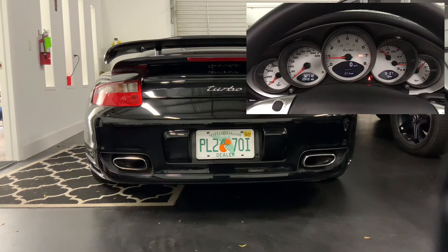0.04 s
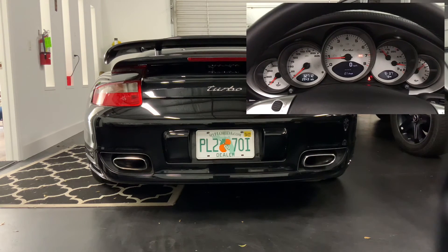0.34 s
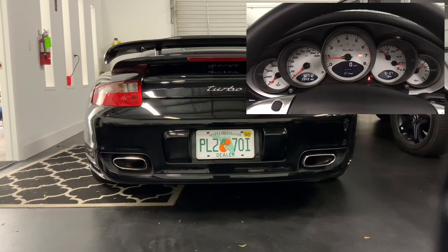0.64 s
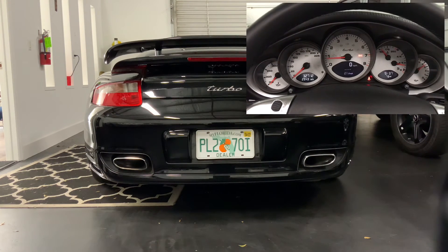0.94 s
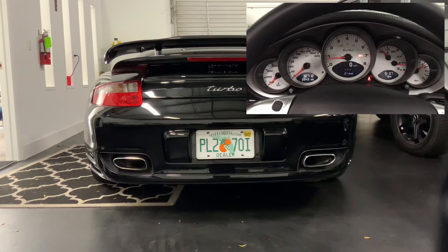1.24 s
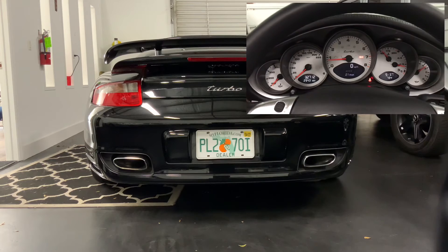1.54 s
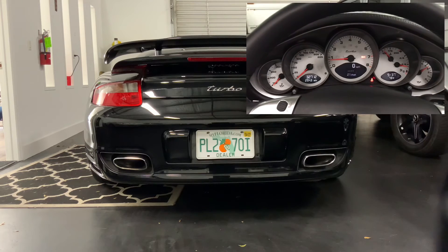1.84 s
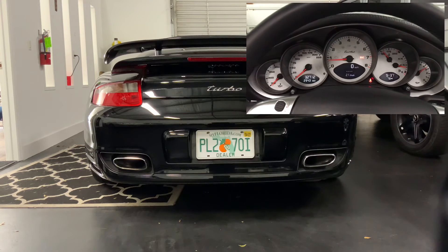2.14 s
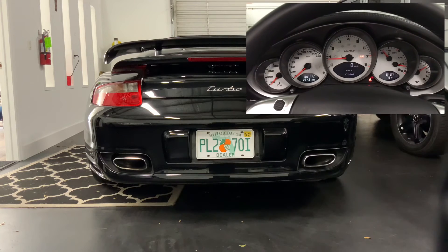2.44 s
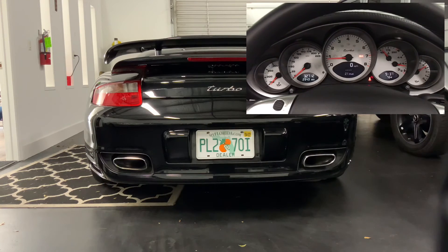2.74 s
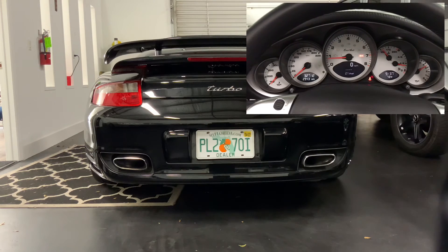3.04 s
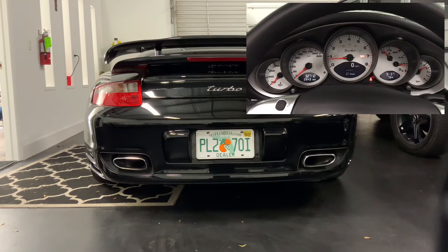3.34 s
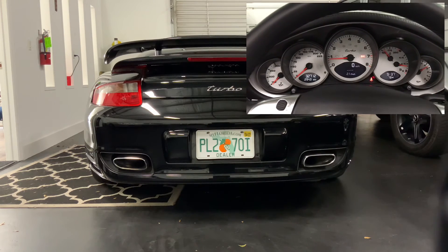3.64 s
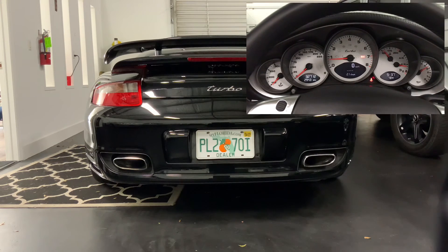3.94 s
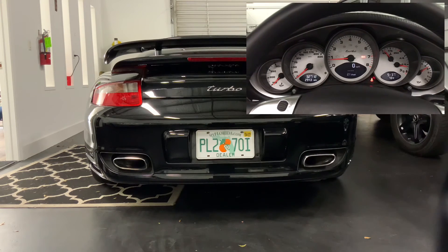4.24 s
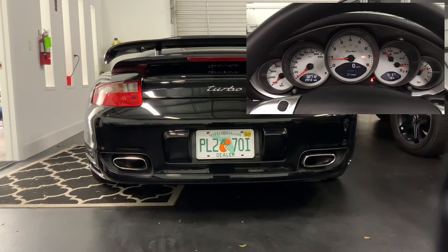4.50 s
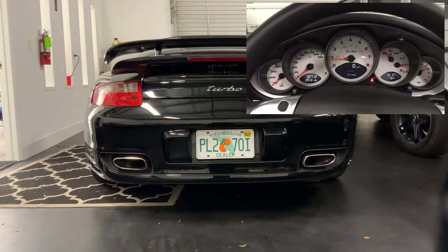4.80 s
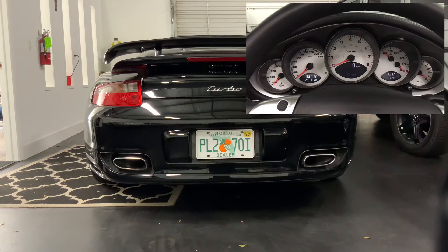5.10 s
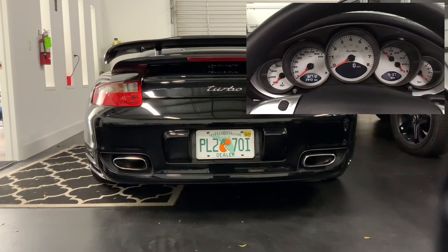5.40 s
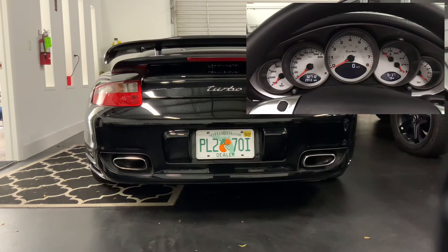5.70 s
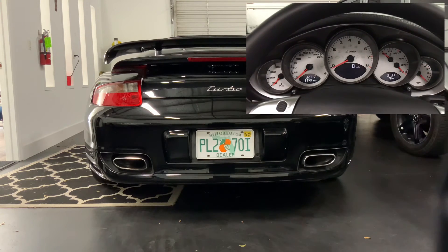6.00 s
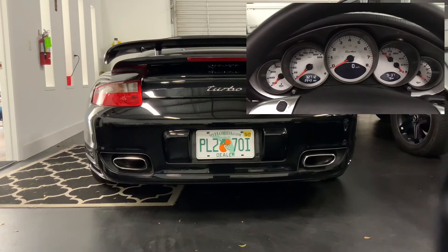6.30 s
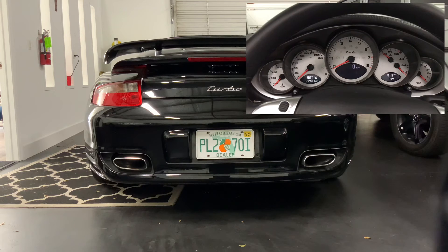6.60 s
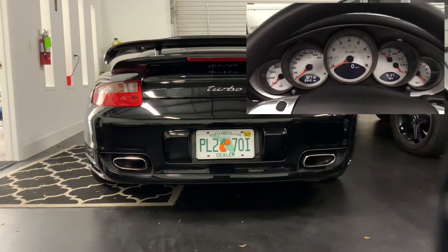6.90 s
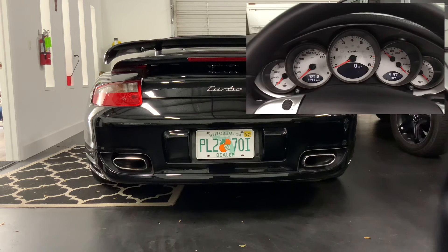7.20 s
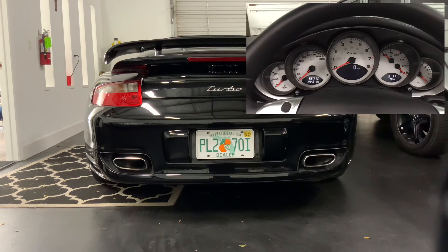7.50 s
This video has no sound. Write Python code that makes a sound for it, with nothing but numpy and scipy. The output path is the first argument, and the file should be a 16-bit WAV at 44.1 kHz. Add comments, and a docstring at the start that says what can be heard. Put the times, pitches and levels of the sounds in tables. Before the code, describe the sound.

A sports car idles in a garage with a steady, deep exhaust drone. The ignition switch clicks and the engine dies away in under a second with a brief chatter and soft shudder. Then, close to the microphone, the key clicks as it is turned back, rattles out of the lock and clacks sharply against hard trim. A sleeve rustles faintly and a low room hum remains.

```python
"""A flat-six sports car idles in a garage, its exhaust pulses sounding as harmonics of the firing rate.
The ignition clicks off and the engine coasts to rest in under a second, puffing into the silencer and
rocking the car's body while its gears chatter. The key is turned back, pulled from the lock and clacks
against hard trim; each impact excites damped modes, and the heavier ones thud in the body.
A sleeve rustles, and a low hum remains in the room."""
import sys
import numpy as np
from scipy import signal
from scipy.fft import rfft, irfft, next_fast_len
from scipy.io import wavfile
from scipy.ndimage import map_coordinates

SR = 44100
rng = np.random.default_rng(int(sys.argv[2]) if len(sys.argv) > 2 else 0)


def transcribe(signal):
    """Save signal, clipped to [-1, 1], as a 16-bit WAV file at the path in sys.argv[1]."""
    frames = np.atleast_2d(signal).T
    limited = np.clip(frames, -1, 1)
    pcm = np.round(limited * 32767).astype(np.int16)
    wavfile.write(sys.argv[1], SR, pcm)


N = 332955
CUT_S, FUEL_FADE_S = 4.963, 0.038  # the last firing, and the time combustion takes to die
COAST_S, COAST_SHAPE = 0.68, 0.7  # time the crank takes to stop; a shape under 1 brakes hardest at the end

# Drift of the idle speed. Each row: time in seconds, firings per second.
IDLE_RATE = [(0.0, 39.33), (1.2, 38.2), (1.35, 38.61), (1.65, 38.19), (1.95, 38.77), (2.1, 38.32),
             (2.55, 39.17), (3.15, 38.82), (3.3, 38.33), (3.75, 38.95), (4.35, 38.12), (4.5, 38.54),
             (4.8, 37.96)]
# The exhaust note. Each row: multiple of the firing rate, relative level in dB.
EXHAUST_ORDERS = [(0.5, -58), (1, 1), (1.5, -33.5), (2, -3), (2.5, -20.5), (3, -7), (3.5, -51), (4, -24),
                  (4.5, -59), (5, -33), (5.5, -28.5), (6, -29.5), (6.5, -38), (7, -32), (7.5, -41.5),
                  (8, -36.5), (8.5, -32), (9, -39), (9.5, -51.5), (10, -38)]
# Drone of a belt-driven pump. Each row: multiple of its stroke rate, level in dB.
PUMP_ORDERS = [(2, -58), (3, -59), (4, -58), (5, -59)]
# Bursts of drive-train chatter. Each row: start in seconds, level in dB.
CHATTER_BURSTS = [(4.976, -34.5), (5.046, -40.5), (5.165, -43.5)]

# Spectral envelopes of the noises. Each row: frequency in Hz, relative level in dB.
PIPE_SPECTRUM = [(76, -28.5), (130, -3.5), (146, -5.5), (221, -8.5), (306, -17.5), (344, -20), (376, -17),
                 (470, -24), (600, -35.5), (780, -38.5), (1320, -120)]
CHURN_SPECTRUM = [(240, -30), (400, -6), (580, -6), (675, -1), (790, -8), (890, -4.5), (1010, -7.5),
                  (1160, -4), (1400, -9.5), (1830, -11.5), (2200, -16), (2500, -15.5), (4500, -22),
                  (6000, -33)]
HISS_SPECTRUM = [(2060, -15), (3500, -8), (4650, -4), (5050, -3), (6740, 0), (7800, -7.5), (8730, -4),
                 (9720, -6.5), (10600, -14), (11200, -8), (11800, -14), (12200, -10), (15800, -23)]
INJECTOR_SPECTRUM = [(11100, -30), (11450, -7), (11540, 0), (11800, -7), (12200, -28)]
GEAR_SPECTRUM = [(600, -31), (950, -3), (1130, 8), (1400, -7), (1800, -8), (2250, -14), (2850, -6.5),
                 (3400, -19), (9000, -30)]
BLADE_SPECTRUM = [(500, -2), (1400, 6), (3500, -5.5), (6500, -3), (10300, -7), (11800, -6), (16000, -21)]
CLOTH_SPECTRUM = [(400, -12), (1400, -4.5), (2200, -5), (3800, -4.5), (7000, -14), (11000, -21),
                  (16000, -25)]
ROOM_SPECTRUM = [(15, -52), (25, -22.5), (43, 4), (64, -13.5), (96, -10.5), (211, -13.5), (450, -30.5),
                 (769, -31.5), (1400, -34.5), (3390, -39.5), (3880, -35), (4210, -38), (4950, -43),
                 (5520, -40), (9460, -45), (10500, -48.5), (15800, -49.5)]

# Resonances. Each row: frequency in Hz, relative level in dB, time to decay by 60 dB in seconds.
SILENCER_MODES = [(47.3, 0.5, 0.62), (59.7, -6, 0.47), (146, -9, 0.22), (211, -19, 0.31), (303, -16, 0.16)]
SWITCH_MODES = [(1170, -8, .06), (1820, 2, .04), (2580, -5, 0.032), (2625, -2, .04), (4060, 3.5, 0.058),
                (5570, -4, .055), (5900, 4, .04), (6511, 7, 0.039), (7240, -10, 0.04), (7915, -3, 0.042),
                (8735, -2, .05), (12170, -6, .042)]
LOCK_MODES = [(1226, 1.5, 0.071), (1915, -3, 0.056), (2550, -10, .04), (3330, -3, .06), (4410, 6, .055),
              (5370, -4, .04), (5840, -7, 0.035), (6700, 4, .06), (8300, -1, .035), (9600, -2, .035),
              (10700, -10, .04), (11500, 1, .04), (12900, 2, .04), (15000, -9, .04)]
FOB_MODES = [(1165, -5, 0.096), (1440, -9, .08), (1470, -9, 0.074), (2510, -14, 0.074), (3616, 5, .06),
             (3680, -1, 0.1), (4550, 4, .08), (5320, -7, 0.076), (6700, -2, .052), (7340, 5, .043),
             (7300, -5, 0.042), (7760, -4, .035), (9800, 0, 0.058), (12900, -13, .05)]

# Impacts in the ignition switch, of the key on the tumblers, and of key and fob on the trim.
# Each row: start in seconds, overall gain in dB, further gains in dB for the clack and for the tick.
SWITCH_HITS = [(4.7249, -10.5, -11.5, -8), (4.7314, -22, -11, -20), (4.7486, -37, 6.5, -22),
               (4.787, -44, -7, 2), (4.828, -23, -4.5, -8), (4.8412, -28, 0.5, -26),
               (4.921, -35.5, -20, -6)]
LOCK_HITS = [(5.9534, -33.5, 1, -25), (5.966, -36.5, 5.5, -8), (5.9902, -37.5, -18, -10.5),
             (6.039, -49.5, 6.5, -24), (6.5261, -35.5, 2.5, -3), (6.5295, -36.5, 9, -29.5),
             (6.575, -55, 12, -7), (6.6058, -30.5, -3, 1.5), (6.6204, -37, -8, -3), (6.6267, -28, -2.5, -1),
             (6.6486, -36, -5, -6), (6.6583, -25, -17, 1.5), (6.6655, -19, -11.5, -6),
             (6.7855, -35, -11, -6.5)]
FOB_HITS = [(6.9556, -36, -10, -10), (6.9777, -31, 5.5, -32), (6.9848, -20.5, -7, -19),
            (6.9957, -9, -11, -22), (7.0022, -18.5, -4.5, -17), (7.0186, -18.5, -5, -16),
            (7.0975, -37.5, 3, -27), (7.1198, -47, -3, -28), (7.1995, -44, -20, -24.5),
            (7.2254, -32.5, -29, -12), (7.232, -33, -31, -33), (7.4634, -54, -25, -21)]
# Thuds in the car's body. Each row: start in seconds, level in dB, 60 dB decay in seconds, pitch in Hz.
BODY_THUDS = [(5.16, -39, .3, 310), (5.955, -36.5, 0.32, 135), (6.532, -33.5, 0.27, 125),
              (6.626, -32, 0.29, 135), (6.661, -35.5, 0.18, 140), (6.999, -35, 0.18, 261)]
# Spectral envelope of a thud. Each row: multiple of its pitch, relative level in dB.
THUD_SPECTRUM = [(.35, -11), (.65, -0.5), (1, 8.5), (1.5, -7), (2.4, -5.5), (4, -9.5), (7, -18)]
# Rubbing of the key blade and of a sleeve. Each row: start in seconds, length in seconds, level in dB.
BLADE_RUBS = [(5.921, 0.046, -47.5), (6.2, .3, -72), (6.49, .05, -61)]
SLEEVE_RUBS = [(6.14, 0.27, -71), (6.44, 0.22, -69), (6.85, 0.47, -57.5)]
# Partials of the room's hum. Each row: frequency in Hz, level in dB.
HUM_PARTIALS = [(59.2, -50), (222, -68.5), (333.8, -75), (500.6, -81.5)]


def crank():
    """Friction stops the unfuelled crank. Returns speed as a share of idle and firing cycles from the cut."""
    t = np.arange(N) / SR
    speed = np.clip(1 - since_cut() / COAST_S, 0, 1) ** COAST_SHAPE
    cycles = np.cumsum(speed * np.interp(t, *np.transpose(IDLE_RATE))) / SR
    return speed, cycles - np.interp(CUT_S, t, cycles)


def exhaust(speed, firings, level_db=-22.5, flutter_db=3, dispersion=0.43, fall_db_per_s=37):
    """Periodic pulses form a harmonic series; uneven cylinders make its weak orders flutter."""
    note = np.zeros(N)
    for order, db in EXHAUST_ORDERS:
        depth_db = 0.5 * order if order in (1, 2, 3) else flutter_db
        lag = dispersion * (order - 1) ** 3  # the pipe delays high orders more, spreading each pulse
        phase = 2 * np.pi * order * firings - lag
        note += amp(db + depth_db * wobble(12)) * np.sin(phase + 0.2 * depth_db * wobble(16))
    fuel = np.clip(1 - since_cut() / FUEL_FADE_S, 0, 1)
    # without fuel the pistons still pump, so a weak note slides down and fades
    pumping = amp(-9.5 - fall_db_per_s * since_cut()) * np.minimum(2 * speed, 1)
    return amp(level_db) * np.maximum(fuel, pumping) * unit(note)


def engine_noise(firings):
    """Amplitude modulation: each stroke swells the gas rumble, the churn of valve gear and belts, and a hiss."""
    stroke = np.cos(2 * np.pi * firings)
    gas = unit(noise(PIPE_SPECTRUM) * amp(2.8 * stroke + 0.7 * wobble(2.8)))
    gas *= run_down(idle_db=-41.5, hold_s=0.14, fall_db_per_s=18.2)
    churn = unit(noise(CHURN_SPECTRUM) * amp(0.25 * stroke))
    churn *= run_down(idle_db=-47.5, hold_s=0.14, fall_db_per_s=18.2)
    hiss = unit(noise(HISS_SPECTRUM) * amp(0.3 * stroke))
    hiss *= run_down(idle_db=-60.5, hold_s=0.1, fall_db_per_s=32)
    return gas + wall_echoes(churn + hiss)


def pump(speed, firings, belt_ratio=1.922):
    """A non-integer drive ratio sets the pump's harmonics beside the firing orders."""
    phase = 2 * np.pi * belt_ratio * firings
    drone = sum(amp(db + 2 * wobble(5)) * np.sin(order * phase + 0.3 * wobble(6))
                for order, db in PUMP_ORDERS)
    return np.sqrt(2) * speed * drone


def injectors(firings, level_db=-76, fall_db=11):
    """A narrow resonance, excited on every second firing, ticks until the cut."""
    envelope = amp(-fall_db * (firings / 2 % 1) + 1.5 * wobble(25))
    return amp(level_db) * (since_cut() == 0) * unit(noise(INJECTOR_SPECTRUM) * envelope)


def silencer_puffs(firings, first_stroke=2.9, puff_db=-32, step_db=1.5, jolt_db=6):
    """Every second stroke of the coasting engine excites the silencer's modes; the first one jolts."""
    out, t = np.zeros(N), np.arange(SR // 2) / SR
    for k in range(6):
        start = np.argmax(firings >= first_stroke + 2 * k) / SR
        db = puff_db - step_db * k + jolt_db * (k == 0)
        add(out, start, amp(db) * ring(SILENCER_MODES, t, scatter_db=7) * rise(t, 0.0072))
    return out


def gear_chatter(t60=0.28, rough_db=2.5, knocks_per_s=210):
    """As the load drops away, gear teeth knock unevenly in exponentially decaying bursts."""
    envelope, t = np.zeros(N), np.arange(SR // 2) / SR
    for start, db in CHATTER_BURSTS:
        add(envelope, start, amp(db - 60 * t / t60) * rise(t, 0.003))
    return envelope * unit(noise(GEAR_SPECTRUM) * amp(rough_db * wobble(knocks_per_s)))


def key():
    """Impact and sliding friction: the switch snaps, the blade scrapes out, the fob knocks on the trim."""
    switch = impacts(SWITCH_HITS, SWITCH_MODES, t60=0.042, attack_s=0.00099,
                     snap_db=-12, clack_db=-2.5, tick_db=-10.5, ring_db=-1.5, lift_db=6)
    lock = impacts(LOCK_HITS, LOCK_MODES, t60=0.043, attack_s=0.0016,
                   snap_db=-9, clack_db=-5, tick_db=-8, ring_db=-7, lift_db=3)
    fob = impacts(FOB_HITS, FOB_MODES, t60=0.048, attack_s=0.0019,
                  snap_db=-7.5, clack_db=-1.5, tick_db=-3.5, ring_db=-5, lift_db=3)
    scrape = rubs(BLADE_RUBS, swell=0.43) * amp(2.2 * wobble(300)) * noise(BLADE_SPECTRUM)
    return switch + lock + fob + scrape


def impacts(hits, modes, t60, attack_s, snap_db, clack_db, tick_db, ring_db, lift_db):
    """A brief contact gives a broadband burst, coloured by the part's modes, which then ring freely."""
    out, t = np.zeros(N), np.arange(SR // 4) / SR
    fade = amp(-60 * t / t60)
    crack = amp(7 - 60 * t / 0.012)  # the sharp leading edge

    def band(points):
        return noise(points, len(t), modes, lift_db)

    for start, db, clack_gain_db, tick_gain_db in hits:
        snap = band([(1800, -17), (2600, 0), (7400, 4), (9500, -9.5)])
        clack = band([(250, -8), (700, 0.5), (1300, 3), (2400, -4.5), (3500, -8.5)])
        tick = band([(7500, -0.5), (9000, 3), (13000, 4), (16000, -7)])
        burst = amp(snap_db) * snap * (fade + 0.5 * crack)
        burst += amp(clack_db + clack_gain_db) * clack * fade ** 0.66  # the lowest band lasts longest
        burst += amp(tick_db + tick_gain_db) * tick * (fade + crack)
        tone = ring(modes, t, scatter_db=4.5)
        tone *= amp(ring_db) / np.abs(tone).max()
        add(out, start, amp(db) * (burst + tone) * rise(t, attack_s))
    return out


def body_thuds():
    """Damped vibration of the car's body: once as the stopping engine rocks, then from heavier key knocks."""
    out, t = np.zeros(N), np.arange(SR // 2) / SR
    for start, db, t60, hz in BODY_THUDS:
        thud = noise([(hz * multiple, level) for multiple, level in THUD_SPECTRUM], len(t))
        add(out, start, amp(db - 60 * t / t60) * rise(t, 0.0021) * thud)
    return out


def sleeve():
    """Friction of cloth makes noise whose level flickers within each stroke."""
    folds = unit(noise(CLOTH_SPECTRUM) * amp(1.5 * wobble(45) + 2 * wobble(400)))
    return rubs(SLEEVE_RUBS, swell=0.38) * folds


def wall_echoes(x, echo_db=-22, spread_s=0.06):
    """Early reflections: nearby hard surfaces add weak, delayed copies of either polarity."""
    out = x.copy()
    for delay, polarity in rng.random((8, 2)):
        add(out, spread_s * delay + 0.001005, amp(echo_db) * np.sign(polarity - 0.5) * x)
    return out


def cabin_reverb(x, t60=0.3, wet_db=-22):
    """Reverberation: dense reflections from the surrounding surfaces merge into a weak, decaying tail."""
    t = np.arange(SR // 2) / SR
    tail = noise([(100, 5), (3500, -7), (8000, -17), (16000, -2.5)], len(t)) * amp(-60 * t / t60)
    return x + amp(wet_db) * signal.fftconvolve(x, tail / np.linalg.norm(tail))[:N]


def room_hum(air_db=-54):
    """Low partials, slightly modulated in level and phase, stand over the steady noise of room air."""
    t = np.arange(N) / SR
    hum = sum(amp(db + 0.65 * wobble(5.2)) * np.sin(2 * np.pi * hz * t + 0.38 * wobble(4.6))
              for hz, db in HUM_PARTIALS)
    return np.sqrt(2) * hum + amp(air_db) * noise(ROOM_SPECTRUM)


def since_cut():
    """Seconds since the last firing, zero while the engine runs."""
    return np.maximum(np.arange(N) / SR - CUT_S, 0)


def run_down(idle_db, hold_s, fall_db_per_s):
    """A gain that holds until shortly after the cut, then decays exponentially."""
    return amp(idle_db - fall_db_per_s * np.maximum(since_cut() - hold_s, 0))


def rubs(rows, swell):
    """Friction gain follows a power of the sliding speed, which is half a sine in each stroke."""
    t = np.arange(N) / SR
    return sum(amp(db) * np.abs(np.sin(np.pi * np.clip((t - start) / length, 0, 1))) ** swell
               for start, length, db in rows)


def ring(modes, t, scatter_db):
    """Free vibration: a sum of damped sinusoids, each struck at a random strength."""
    return sum(amp(db + scatter_db * rng.standard_normal() - 60 * t / t60) * np.sin(2 * np.pi * hz * t)
               for hz, db, t60 in modes)


def noise(points, length=N, modes=(), lift_db=0, width_hz=70):
    """White noise filtered by a (Hz, dB) envelope with a resonance peak at each mode, at rms 1."""
    point_hz, point_db = np.transpose(points)
    size = next_fast_len(length)
    hz = np.fft.rfftfreq(size, 1 / SR)
    shape_db = np.interp(np.log(hz + 1), np.log(point_hz), point_db, left=-120, right=-120)
    peaks_db = sum(lift_db / (1 + ((hz - mode[0]) / width_hz) ** 2) for mode in modes)
    white = rfft(rng.standard_normal(length), size)
    return unit(irfft(white * amp(shape_db + peaks_db), size)[:length])


def wobble(rate):
    """A smooth random curve with rate knots per second."""
    return map_coordinates(rng.standard_normal(int(N * rate / SR) + 4), [np.arange(N) * rate / SR])


def rise(t, attack_s):
    """A first-order onset with time constant attack_s."""
    return 1 - np.exp(-t / attack_s)


def amp(db):
    """Decibels to amplitude ratio."""
    return 10 ** (np.asarray(db) / 20)


def unit(x):
    """The signal scaled to rms 1."""
    return x / np.sqrt(np.mean(x ** 2) + 1e-20)


def add(track, start_s, sound):
    """Superpose a sound on the track from start_s on."""
    part = track[round(start_s * SR):][:len(sound)]
    part += sound[:len(part)]


def scene():
    """Superposition in one channel: the engine, timed by its crank, the key close by, and the room."""
    speed, firings = crank()
    engine = exhaust(speed, firings) + engine_noise(firings) + pump(speed, firings) + injectors(firings)
    coasting = silencer_puffs(firings) + gear_chatter()
    return (engine + coasting + cabin_reverb(key()) + body_thuds() + sleeve() + room_hum())[None]


def record(dry, top_hz=15850):
    """An ideal low-pass filter removes everything above top_hz."""
    size = next_fast_len(N + SR // 4)
    passband = np.fft.rfftfreq(size, 1 / SR) < top_hz
    return irfft(rfft(dry, size) * passband, size)[:, :N]


dry = scene()
out = record(dry)
transcribe(out)
```